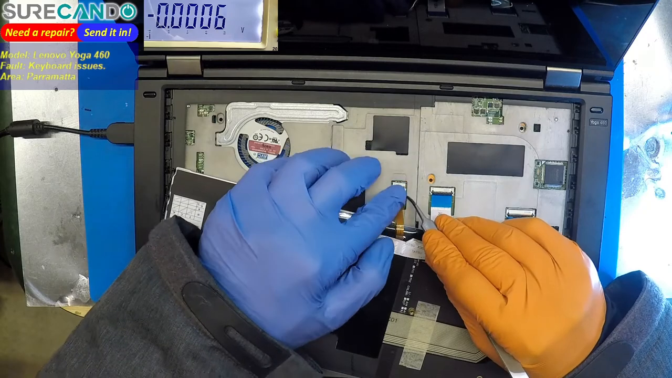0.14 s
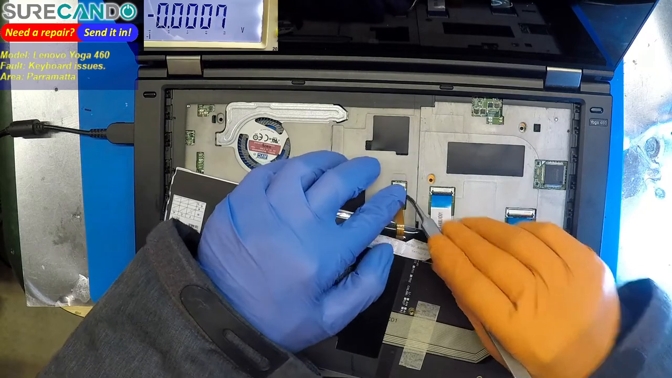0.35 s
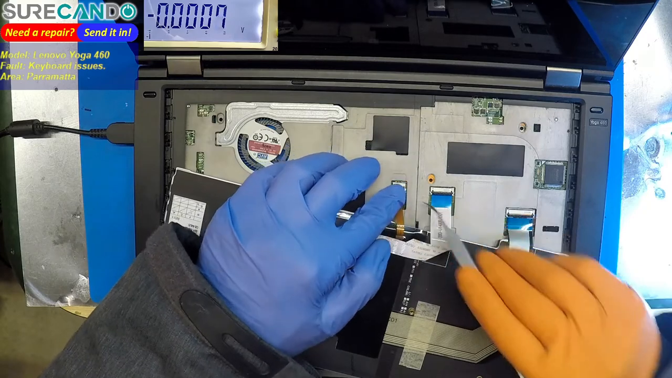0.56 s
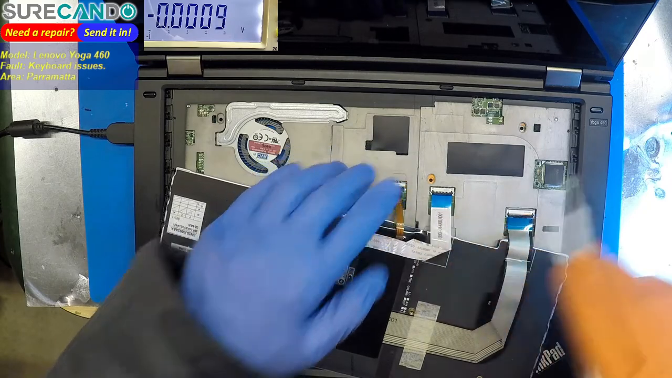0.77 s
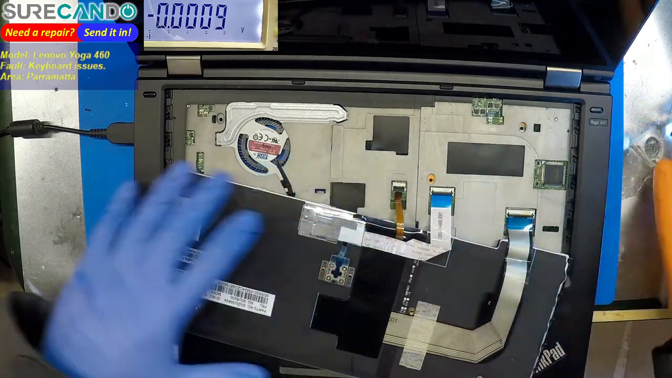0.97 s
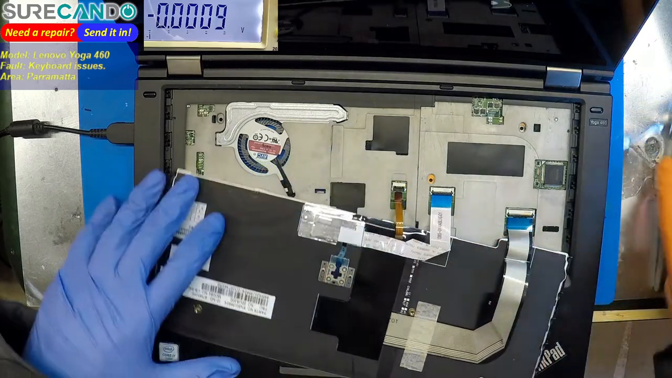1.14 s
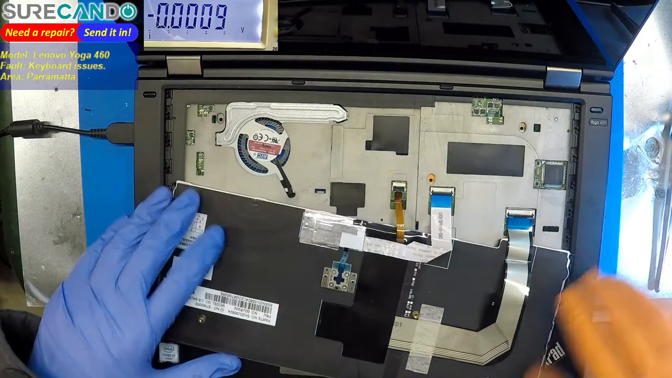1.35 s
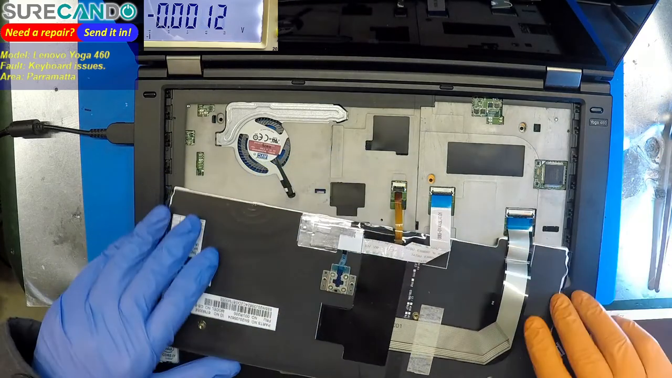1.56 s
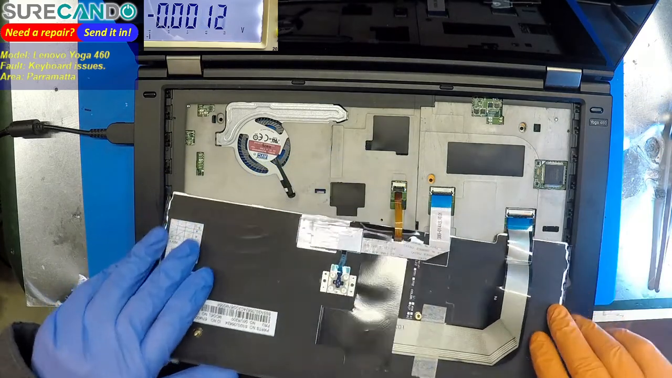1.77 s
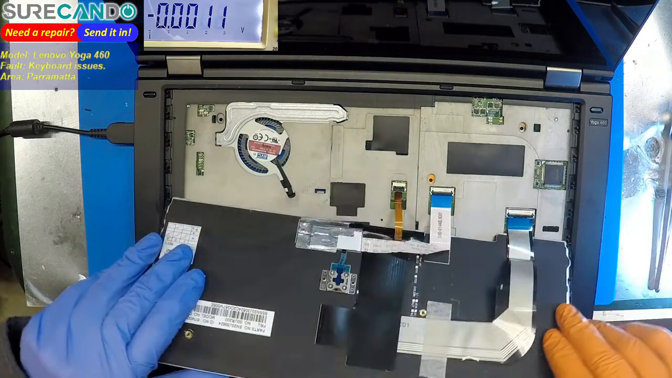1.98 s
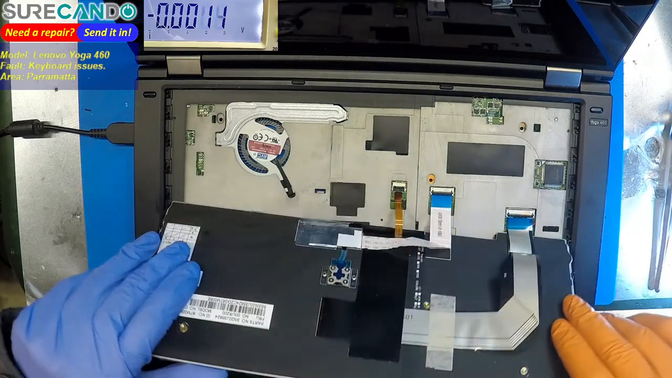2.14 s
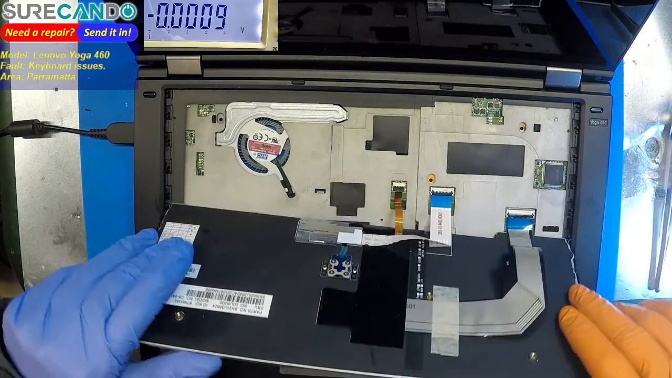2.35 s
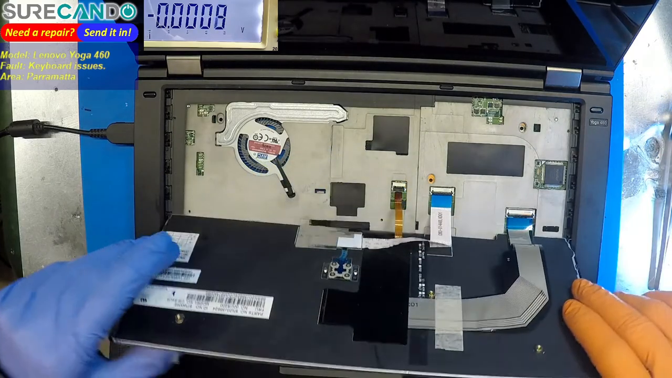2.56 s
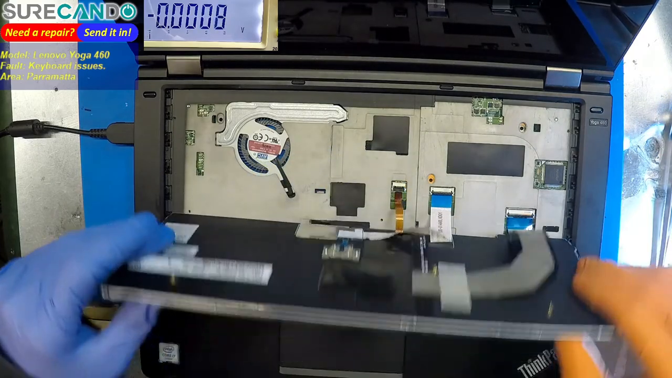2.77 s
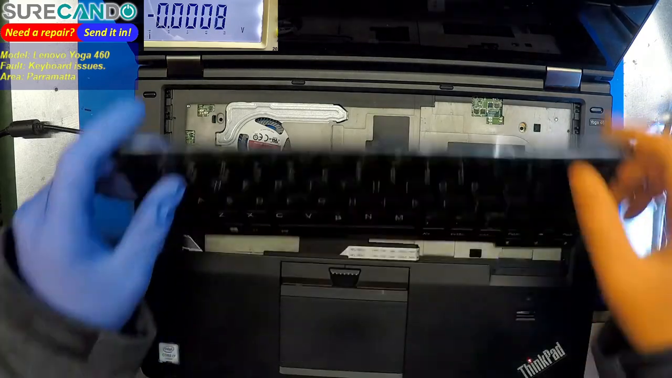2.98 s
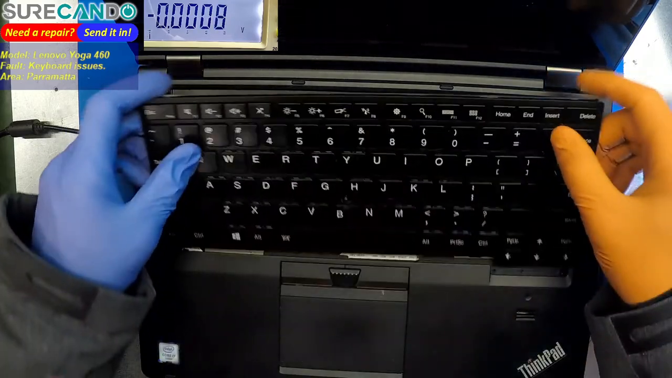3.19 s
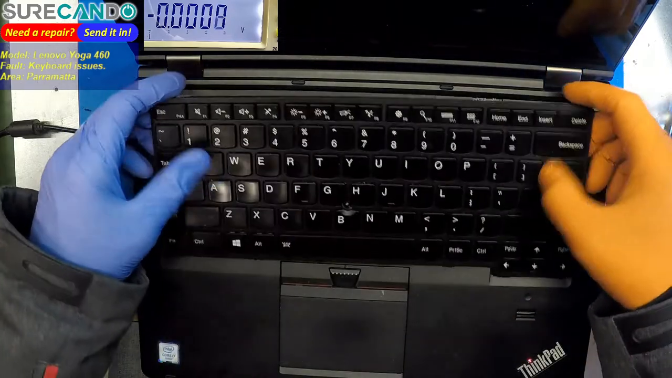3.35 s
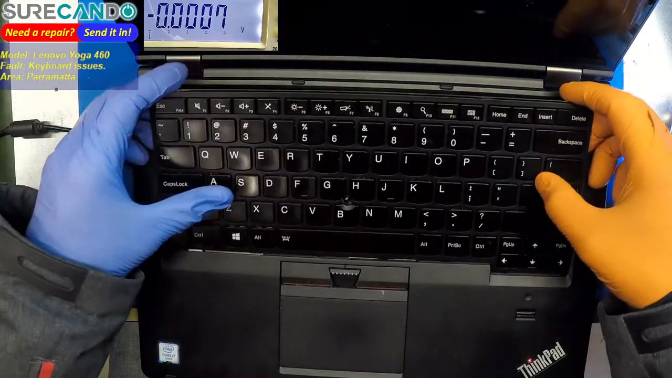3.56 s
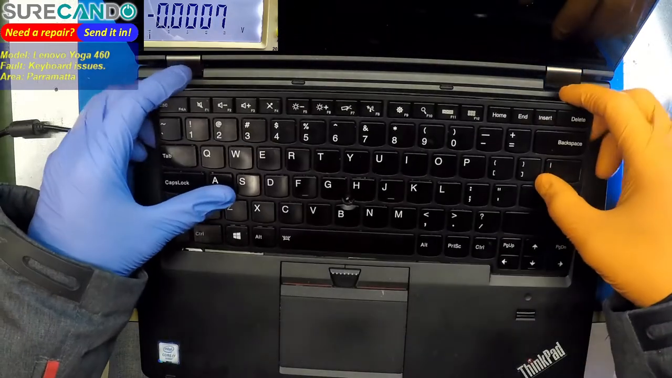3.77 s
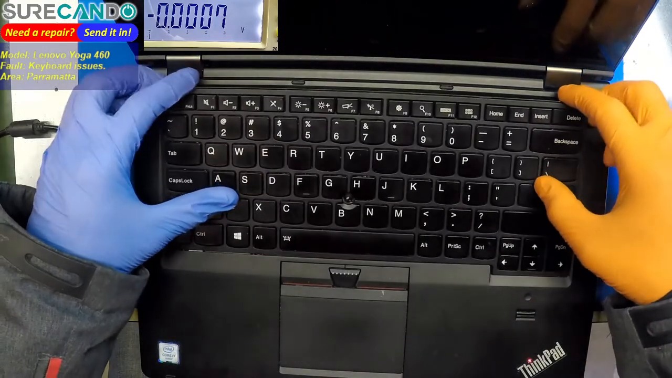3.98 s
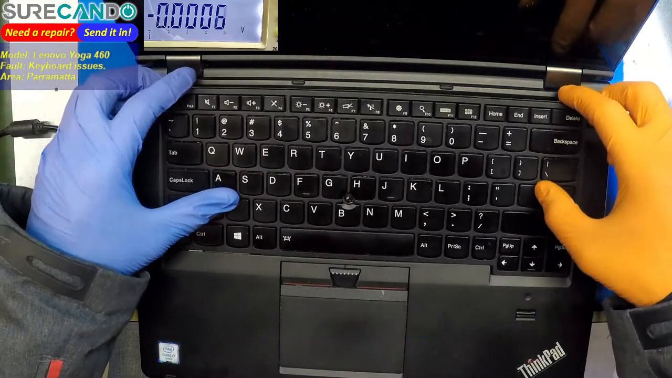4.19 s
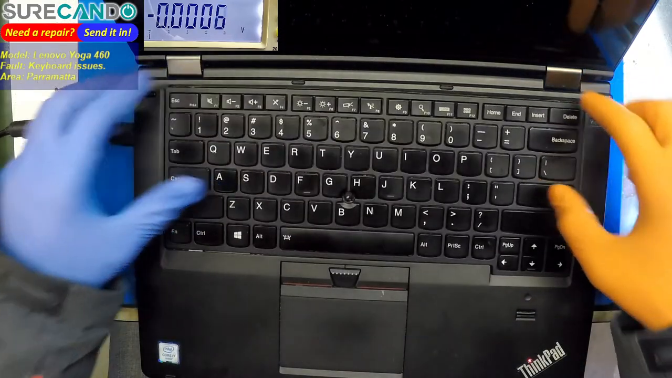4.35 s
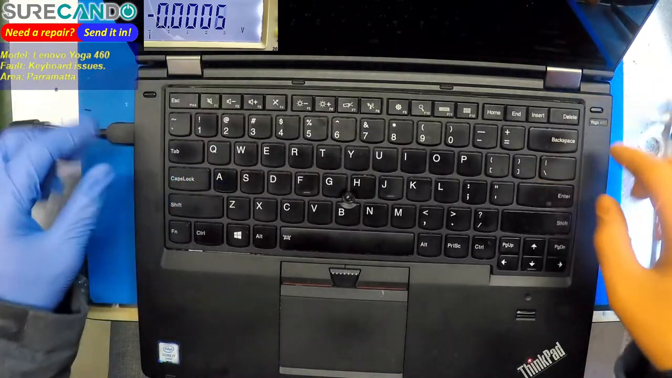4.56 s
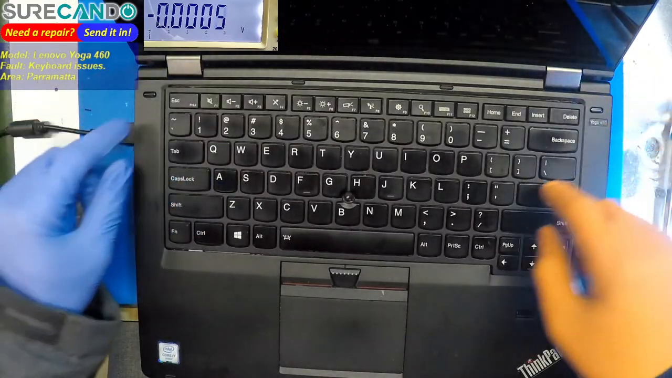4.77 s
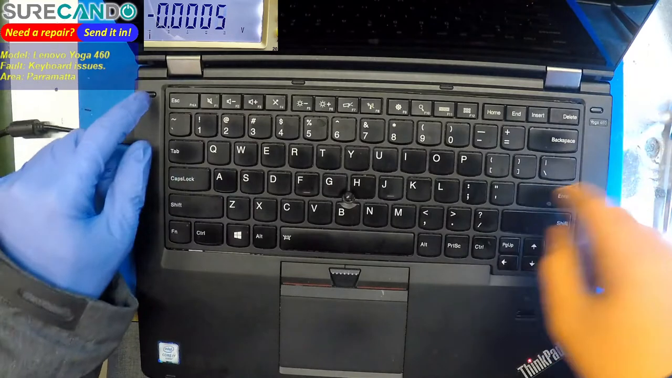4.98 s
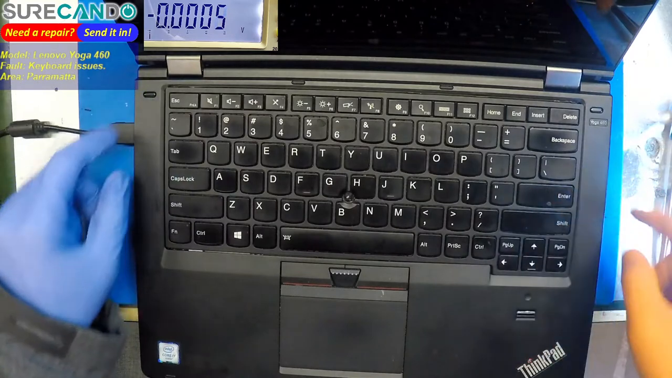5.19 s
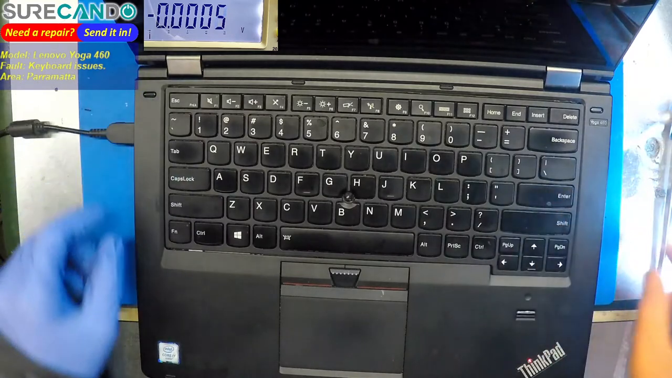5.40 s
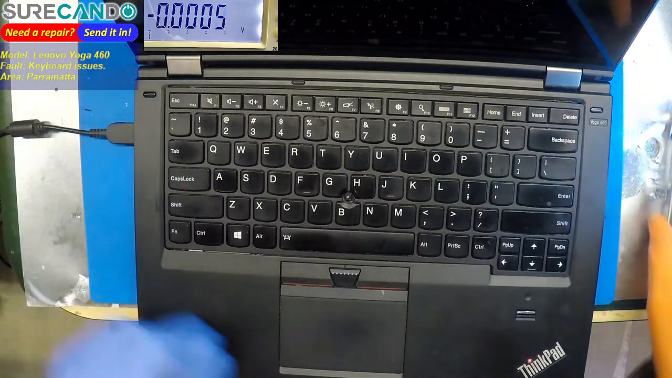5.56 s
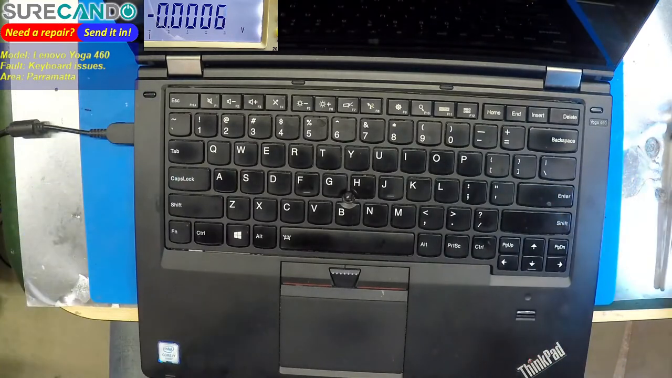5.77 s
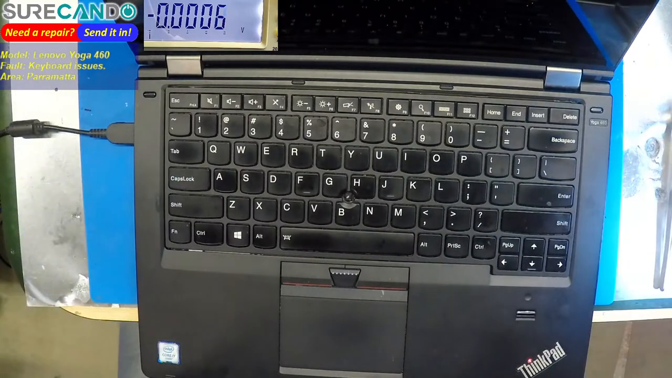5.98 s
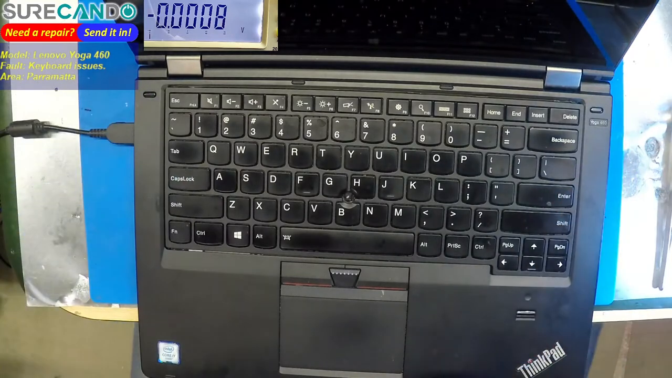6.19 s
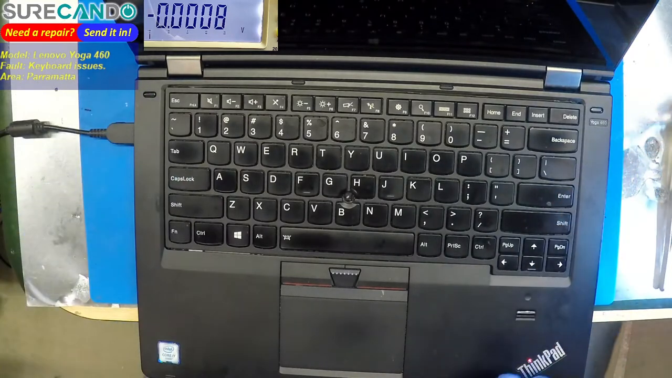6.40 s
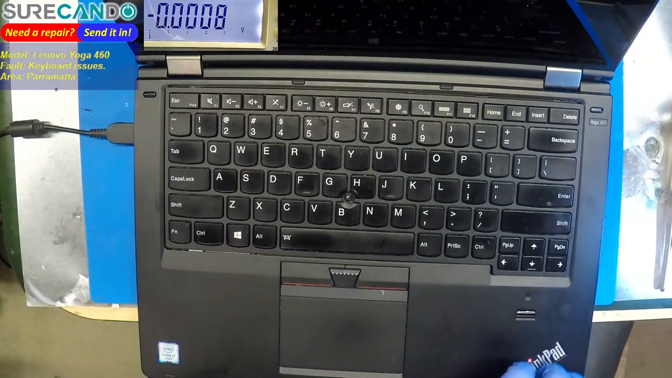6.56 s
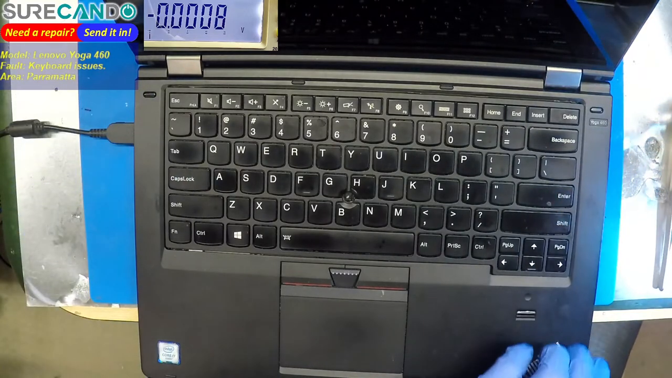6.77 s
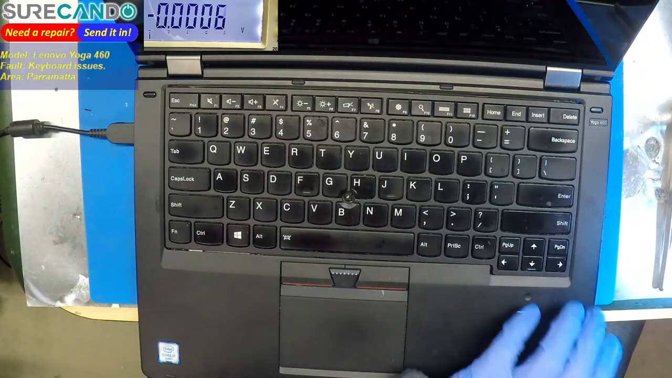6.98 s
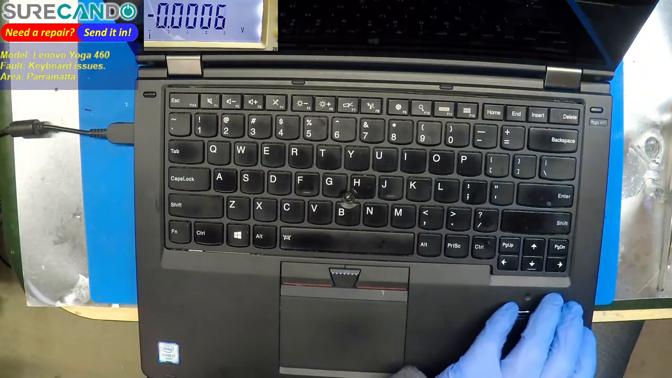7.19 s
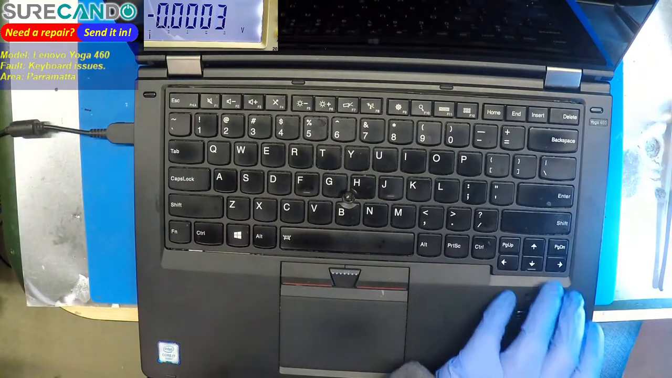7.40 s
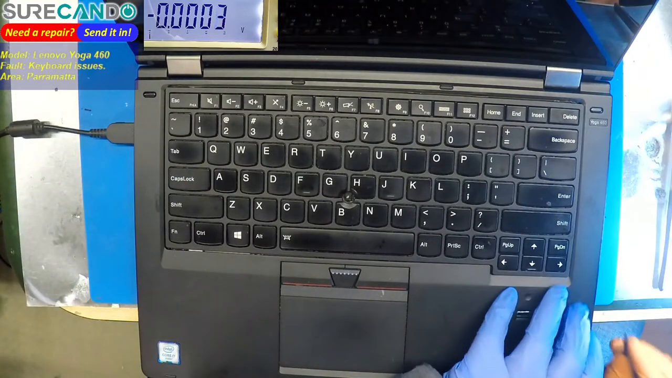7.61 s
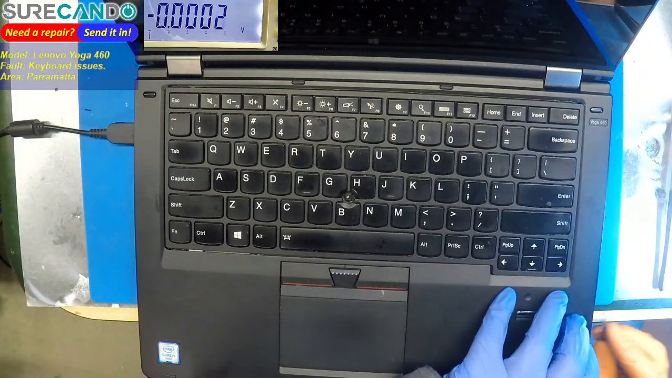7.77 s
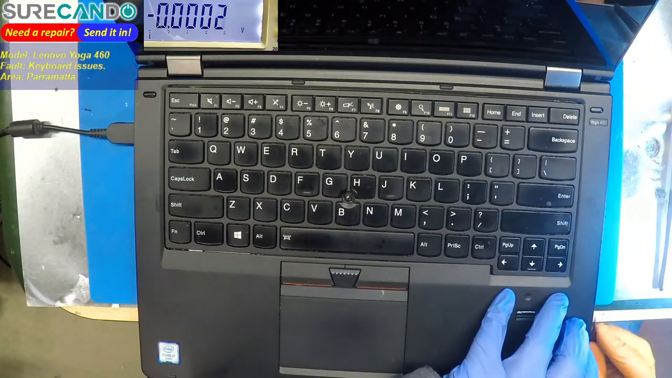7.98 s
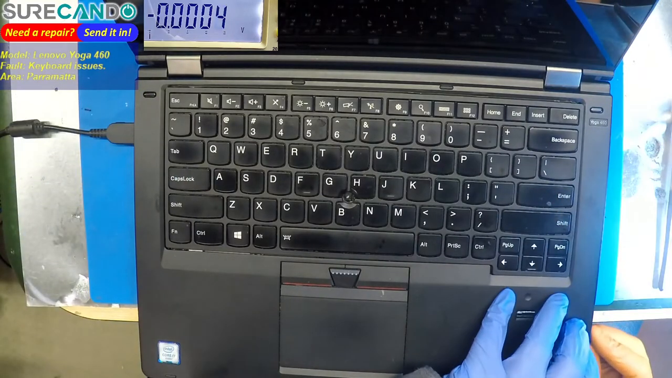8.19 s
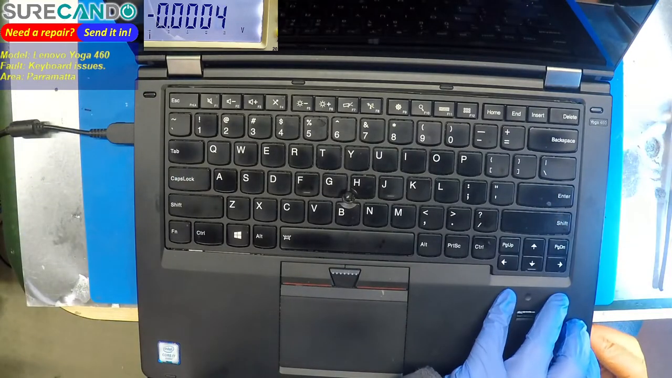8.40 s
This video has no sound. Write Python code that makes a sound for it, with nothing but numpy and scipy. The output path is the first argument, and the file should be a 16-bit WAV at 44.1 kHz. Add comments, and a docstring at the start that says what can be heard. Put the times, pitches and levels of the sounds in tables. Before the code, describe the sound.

A loose laptop keyboard clacks, scrapes and snaps into place on a bench, with soft rubbing and a vehicle droning outside.

```python
"""Plastic clicks and rattles: a loose laptop keyboard is turned over and snapped into its case on a bench.
Each blow rings the modes of plate and case into a small room; the keyboard drags in stick-slip scrapes
and heavy moves make the bench boom. Grainy hiss swells: rubbing, and the fading wash after loud knocks.
Behind it a vehicle drones outside, over room hush, mains hum, a thin electric whine and a meter's whistle."""
import sys
import numpy as np
from scipy import signal
from scipy.fft import rfft, irfft, next_fast_len
from scipy.io import wavfile
from scipy.ndimage import uniform_filter1d

SR = 44100
rng = np.random.default_rng(int(sys.argv[2]) if len(sys.argv) > 2 else 0)


def transcribe(u):
    """Save the signal u as a 16-bit wav file named by the first command-line argument.

    u: samples, shape (n,) or (channels, n), limited to [-1, 1]; the rate is SR.
    q: integer samples, one column per channel.
    """
    v = np.clip(np.atleast_2d(u).T, -1, 1)
    q = np.round(v * 32767).astype(np.int16)
    wavfile.write(sys.argv[1], SR, q)


N = 372204
TIME_S = np.arange(N) / SR


def knocks():
    """A brief swell of noise leads into each click, which chatters and rings plate, case and room."""
    # start_s, level_db, thud_db, panel_db, snap_db, panel_hz, clack_hz, rattle_ms, room_db, lead_in_db
    blows = [(0.1955, -39.5, -23, -23, -16, 1047, 2870, 1.7, -2.5, -23),
             (0.4212, -41, -24, -6, -8, 1080, 3200, 1.7, -4, -23),
             (0.438, -25, -31, -20.5, -11, 1410, 2360, 3.1, -7, -9),
             (0.622, -41, -24, -19, -18, 1030, 2510, 3.2, 1.5, -23),
             (0.9264, -26, -17, -7, -14, 1390, 2660, 1.5, -1.5, -41),
             (0.9318, -27, -24, -6, -10, 1360, 3400, 1.6, -2.5, -34),
             (0.9463, -37, -20, -8, -15, 1310, 2640, 2, 1, -20),
             (1.0284, -10, -16, -18, -13.5, 1770, 2930, 1.5, -6, -28),
             (1.0346, -11, -22, -14.5, -11, 979, 2800, 4.3, -20, -21),
             (1.0646, -20, -22, -7.5, -12, 1510, 3300, 1.8, -5.5, -25),
             (1.289, -40.5, -20, -20, -12, 904, 2400, 2.3, 5, -23),
             (1.3668, -43, -17, -24, -4, 1200, 5280, 2.3, -18, -23),
             (1.537, -31, -32, -13, -16, 958, 3020, 3.1, -5.5, -23),
             (1.6373, -34.5, -14, -13.5, -14, 1740, 2540, 2, -8, -21),
             (1.722, -30, -22, -14.5, -14, 2410, 4500, 2.7, -17, -21),
             (1.9319, -13.5, -25, -20, -16, 1900, 2690, 1.6, -16, -18),
             (2.0171, -37, -22, -17, -16.5, 1618, 2874, 2.8, -0.5, -23),
             (2.6261, -32, -27, -18, -12.5, 1943, 4450, 3.3, -17, -16),
             (2.7724, -29, -17, -13.5, -26, 1516, 2460, 3.7, -1.5, -21),
             (2.8674, -31, -14.5, -13, -9.5, 1040, 2900, 1.9, -1.5, -26),
             (2.9473, -19, -26, -19, -21, 1620, 3370, 1.7, -9, -11),
             (2.9622, -7.5, -28, -22.5, -14, 2040, 4270, 3, -16, -20),
             (2.9754, -25.5, -16.5, -20, -9, 1990, 4060, 3, -5.5, -23),
             (3.162, -29, -24, -14, -19, 2220, 2620, 2.3, -12, -23),
             (3.1753, -18.5, -19.5, -22, -24, 1320, 2730, 1.94, -11, -2.5),
             (3.246, -5.5, -35, -17.5, -10, 1600, 3290, 2.6, -13.5, -12),
             (3.2769, -0.5, -28, -23, -12, 1410, 3320, 2.6, -15, -18),
             (3.2864, -14, -20, -14.5, -14, 2060, 3130, 2.3, -18, -18),
             (3.3384, -3, -28, -16, -16, 936, 4670, 0.77, -19.5, -21),
             (3.4496, -7, -37, -22.5, -12, 1610, 4400, 2.9, -10, -35),
             (3.457, -13.5, -33, -16, -7.5, 1100, 4020, 2.6, -28, -26),
             (3.471, -13.5, -31, -20.5, -11.5, 1050, 4330, 3.4, -26, -36),
             (3.6126, -28.5, -35, -25, -9, 1000, 5220, 2.3, -25, -41),
             (3.6336, -39, -16, -11, -11, 2260, 3260, 1.28, -10, -18),
             (3.7215, -38, -14, -1, -14, 956, 2380, 1.8, -4.5, -15),
             (3.7956, -39.5, -20, -5, -11, 1390, 2700, 1.7, -3, -19),
             (3.8315, -19, -19, -14.5, -14, 1160, 2964, 1.27, -3, -13),
             (3.846, -11.5, -33, -13.5, -7, 1860, 2400, 2.6, -29, -32),
             (3.8509, -2, -35, -18.5, -10, 2470, 2510, 1.7, -17, -16),
             (3.9562, -19.5, -30, -19, -15, 1850, 2350, 2.1, -13, -14),
             (4.136, -46, -10, -11, -6, 997, 2750, 2.3, -20, -23),
             (4.2467, -16, -20, -24, -8.5, 1340, 4400, 1.86, -13.5, -9),
             (4.3077, -34, -27, -15, -4, 1220, 2600, 2.5, -15, -33),
             (4.3115, -35.5, -13, -17, -7, 1210, 2420, 2.5, -5, -25),
             (5.4183, -33, -21, -19, -27, 1035, 5490, 0.93, -27, -17),
             (5.5248, -34, -19, -12, -21, 1480, 3030, 3.4, 0.5, -24.5),
             (5.7664, -36, -10, -8, -16, 1780, 2460, 2.3, 1.5, -23),
             (5.8568, -41, -13, -7, -22, 1780, 2440, 2.25, -22, -23),
             (5.9888, -31, -17, -14, -19, 1773, 2730, 2.9, -4, -21),
             (6.0198, -26.5, -19, -12.5, -20, 1700, 2510, 4.1, -14, -23),
             (6.1804, -20, -21, -15, -8, 2210, 3820, 2.3, -8.5, -26),
             (6.2977, -28.5, -9.5, -6.5, -14, 1660, 2850, 1.7, -6.5, -23),
             (6.3915, -41, -3, -3, -20, 1580, 2430, 2.7, -7, -23),
             (6.6102, -15.5, -28.5, -23, -9.5, 1460, 4470, 2.7, -12, -28),
             (6.6934, -40, 3, -8, -11, 1502, 2620, 1.5, -15, -23),
             (6.7045, -28.5, -10, -10, -15, 1670, 3020, 2.7, -21, -23),
             (6.728, -19.5, -32, -14, -34, 1490, 2330, 1.7, -17, -35),
             (6.7442, -6, -28, -18, -14, 1650, 5600, 4, -17, -13),
             (6.7669, -26, -23, -13, -11.5, 1940, 2410, 1.8, -1, -23),
             (6.9734, -38.5, 1, -8, -8, 1003, 2440, 1.8, -5.5, -29),
             (6.982, -44.5, -5, 10, -20, 1540, 3420, 2.3, -10, -25),
             (7.0117, -40.5, -10, -27, -3, 1110, 2600, 2.1, -17, -23),
             (7.3816, -30.5, -15, -17, -26, 1877, 2850, 1.9, -18, -9),
             (7.7075, -37.5, -23, -18, -18, 1315, 2720, 2.3, -14, -20),
             (7.7416, -40, -22, -20, -27, 1074, 2610, 2.3, -3, -20),
             (7.9745, -35, -22, 0, -38.5, 1900, 2540, 1.6, -14, -26),
             (8.1993, -48.5, -18, 6, -30, 1670, 2474, 2.3, -9, -11),
             (8.31, -20.5, -24, -16, -23.5, 1470, 3810, 2.4, -12.5, -30)]
    # thud, panel, clack, snap and top bands: low_hz, high_hz
    bands_hz = [(250, 900), (900, 2400), (2400, 5500), (5500, 10000), (10000, 15000)]
    # one value per band
    carry_db = [-1.7, 3, -10.5, 1, -8]
    rattle_stretch = [2.9, 2.75, 0.95, 0.83, 0.79]  # factor on rattle_ms; low bands chatter longer
    crack_gain = [1, .22, .45, .55, 1]  # unpitched part
    room_t60_s = [0.26, 0.35, 0.21, 0.18, 0.094]
    tail_ring_gain = [0, .7, .25, .3, 0]  # room tail fed through the modes
    lead_in_rise_s, room_rise_s = 0.0041, 0.0052
    size, lead = SR // 3, SR // 40
    t = np.arange(size) / SR
    tracks = np.zeros((len(bands_hz), N + size + lead))
    for (start_s, level_db, thud_db, panel_db, snap_db,
         panel_hz, clack_hz, rattle_ms, room_db, lead_in_db) in blows:
        i = int(start_s * SR)
        share_db = np.add(carry_db, [thud_db, panel_db, 0, snap_db, snap_db])
        lead_in = undb(lead_in_db) * np.exp(-t[lead:0:-1] / lead_in_rise_s)
        snap_hz = 7500 * np.exp(.1 * rng.uniform(-1, 1))
        for k, spot_hz in enumerate([0, panel_hz, clack_hz, snap_hz, 0]):  # 0: no modes
            chatter = rng.standard_normal(size + lead)
            chatter[lead] = 4  # first contact
            decay = np.exp(-t * 1000 / (rattle_ms * rattle_stretch[k]))
            tail = undb(room_db - 60 * t / room_t60_s[k]) * (1 - np.exp(-t / room_rise_s))
            blow = chatter * np.r_[lead_in, decay]
            room = chatter * np.r_[np.zeros(lead), tail]
            if spot_hz:
                blow = crack_gain[k] * blow + 1.5 * body_ring(blow + tail_ring_gain[k] * room, spot_hz)
            blow += crack_gain[k] * room
            low_hz, high_hz = bands_hz[k]
            band_share = (high_hz - low_hz) / (SR / 2)
            tracks[k, i:i + size + lead] += blow * undb(level_db + share_db[k]) / np.sqrt(band_share)
    return sum(band(x[lead:lead + N], *edges, order=3) for x, edges in zip(tracks, bands_hz))


def body_ring(blow, spot_hz):
    """A blow rings the modes near the pitch of the struck spot."""
    # plate and case modes: pitch_hz, width_hz
    modes = [(1030, 160), (1200, 220), (1350, 250), (1500, 105), (1700, 150), (1880, 164), (2060, 105),
             (2300, 520), (2700, 220), (3000, 64), (3270, 250), (3650, 190), (4070, 240), (4500, 130),
             (4950, 260), (5430, 140), (6000, 140), (6400, 510), (6850, 240), (7300, 120), (7700, 110),
             (8400, 220), (9200, 420)]
    log_spread = .06
    out = np.zeros_like(blow)
    for pitch_hz, width_hz in modes:
        gain = np.exp(-.5 * (np.log(pitch_hz / spot_hz) / log_spread) ** 2)
        if gain > .02:
            out += gain * ring(blow, pitch_hz, width_hz)
    return out


def scraping():
    """The keyboard drags over the case: dense, uneven stick-slip clicks ring its plate."""
    # drags: peak_s, level_db, swell_s, fade_s, brightness_db
    drags = [(.41, -57, 0.36, .09, 0), (2.391, -51, 0.022, 0.057, -6), (2.451, -48.5, 0.048, 0.069, -3.5),
             (2.495, -48.5, 0.091, .025, -7), (2.77, -47, 0.055, 0.072, -4),
             (2.837, -33.5, 0.021, 0.036, -10), (2.87, -60, 0.036, .08, 0), (5.755, -43, 0.056, 0.081, -13),
             (5.99, -45.5, 0.063, .04, -22), (6.03, -50, 0.055, 0.022, -10),
             (6.30, -40.5, 0.013, 0.065, -4)]
    # plate modes, low to high: pitch_hz, width_hz, gain_db
    modes = [(1473, 390, 10), (2580, 600, 4), (3200, 240, 1), (4370, 600, 4), (6170, 1300, 6),
             (8050, 2200, -0.5), (10850, 5100, -13)]
    slips = rng.standard_normal(N) * undb(1.5 * rng.exponential(size=N) + 2.5 * walk(150))
    rings = [undb(gain_db) * ring(slips, hz, width_hz) for hz, width_hz, gain_db in modes]
    dull, bright = level(sum(rings[:3]), 0), level(sum(rings[3:]), 0)
    dull_gain = sum(swell(*move) for *move, _ in drags)
    bright_gain = sum(swell(*move) * undb(brightness_db) for *move, brightness_db in drags)
    return dull * uniform_filter1d(dull_gain, 400) + bright * uniform_filter1d(bright_gain, 400)


def bench_thumps():
    """Heavy moves set off a dull, noisy resonance of the bench top."""
    # booms: start_s, pitch_hz, level_db, t60_s
    booms = [(1.031, 170, -25.5, 0.12), (2.85, 123.7, -45, 0.24), (3.171, 102, -40, 0.43),
             (3.28, 96.5, -37, 0.35), (3.85, 141, -39, 0.098), (4.25, 148, -41.5, 0.2),
             (5.76, 178, -46, 0.27), (7.439, 284, -42.5, 0.3)]
    rise_s, q = 0.011, 6.4
    out = np.zeros(N)
    for start_s, pitch_hz, level_db, t60_s in booms:
        t = np.maximum(TIME_S - start_s, 0)
        envelope = undb(level_db - 60 * t / t60_s) * (1 - np.exp(-t / rise_s))
        out += envelope * level(ring(rng.standard_normal(N), pitch_hz, pitch_hz / q), 0)
    return out


def grainy_hiss():
    """Swells of grainy hiss: rubbing, and the fading wash after loud knocks."""
    # swells: peak_s, level_db, swell_s, fade_s
    swells = [(0, -47.5, .1, 0.091), (0.751, -55, 0.32, 0.37), (1.12, -52, .15, 0.57),
              (1.6, -61.5, 0.59, 0.66), (2.419, -63.5, 0.63, 0.46), (2.94, -51, 0.47, 0.37),
              (3.28, -43.5, 0.23, 0.17), (3.68, -61.5, 0.32, 0.45), (4.22, -54.5, 0.14, 0.58),
              (4.7, -62.5, 0.32, .6), (5.45, -56.5, 0.66, 0.79), (5.88, -50, 0.65, 0.54),
              (6.42, -61, 0.496, 0.87), (6.75, -54, 0.67, 0.28), (7.36, -55, 0.74, 0.63)]
    # dull rustle: time_s, level_db
    rustle = [(0.0, -59.5), (0.96, -58), (1.1, -52.5), (1.34, -56), (2.0, -63.5), (2.3, -58), (3.38, -54),
              (3.55, -57), (4.09, -49.5), (4.49, -53.5), (5.08, -58), (5.97, -46), (6.51, -51),
              (6.82, -51.5), (7.05, -56), (7.45, -54.5), (7.78, -57), (8.44, -60)]
    # hiss spectrum: frequency_hz, density_db
    spectrum = [(300, 9.5), (450, 0.5), (1000, 5.5), (1700, 1.5), (2600, -2.5), (4500, -10.5), (7000, -9),
                (8600, -8.5), (9600, -11), (13000, -8.5), (16500, -9)]
    crackles_per_s, crackle_db, still_db = 12, 6, -77
    grain_db = 1.5 * walk(300) + .8 * walk(25)
    crackle_onsets = 1. * (rng.random(N) < crackles_per_s / SR)
    crackles = uniform_filter1d(crackle_onsets, size=60) * 60
    grain_db += crackle_db * np.minimum(crackles, 1)
    dull_db, = curves(rustle)
    hiss_db = 20 * np.log10(undb(still_db) + sum(swell(*row) for row in swells))
    top_db = -36 + 0.62 * hiss_db
    out = np.zeros(N)
    for low_hz, high_hz, level_db in [(2400, 9000, hiss_db), (400, 2400, dull_db), (9000, 17000, top_db)]:
        hiss = coloured(rng.standard_normal(N) * undb(grain_db), spectrum)
        out += level(band(hiss, low_hz, high_hz), level_db)
    return out


def traffic():
    """An unsteady engine drone behind the wall sinks in pitch, over rumble that drops near the end."""
    # engine: time_s, pitch_hz, drone_db, third_harmonic_db
    engine = [(0, 58.1, -47, -71), (.21, 57.4, -41, -75), (.75, 57.2, -46, -75), (1.05, 50.9, -45.5, -60),
              (1.43, 56.4, -52, -85), (1.8, 58.1, -46.5, -61.5), (2.5, 53.3, -50, -65.5),
              (2.7, 47.2, -52, -65), (2.94, 45.2, -49.5, -66), (4.04, 44.1, -44, -54),
              (4.45, 43.6, -52, -50), (5.03, 43.7, -45, -72), (5.4, 43.7, -51.5, -49.5),
              (5.62, 44.16, -44, -75), (5.92, 43.8, -53.5, -59), (6.56, 42.5, -52, -55.5),
              (6.8, 42.5, -53, -55.5), (7.24, 44.5, -53.5, -68), (8.44, 43.6, -54.5, -59.5)]
    pitch_hz, drone_db, third_db = curves(engine)
    rumble_db = np.interp(TIME_S, [6.5, 7.5], [-54, -65.5]) + 5.5 * walk(6.1)
    phase = 2 * np.pi * np.cumsum(pitch_hz * (1 + 0.0208 * walk(8.8))) / SR
    tone = np.sin(phase) * undb(2.7 * walk(7.0))
    boom = band(rng.standard_normal(N), 43.7, 74.0)
    rumble = band(rng.standard_normal(N), 46.0, 115.0)
    third = np.sin(3 * phase) * undb(third_db)
    drone = level(tone, 0) + level(boom, -8)
    return drone * undb(drone_db) + level(rumble, rumble_db) + third


def room_air():
    """Steady hush, with mains hum and electric whine as narrow bands of noise."""
    # hush spectrum: frequency_hz, density_db
    spectrum = [(20, -2), (26, -12), (32, -12), (60, 1), (200, -7.5), (500, -12.5), (1500, -24),
                (2500, -36), (4500, -30), (9000, -34), (13000, -32.5), (16500, -53)]
    # hum and whine: pitch_hz, width_hz, level_db
    whines = [(150, 4, -66), (12260, 350, -78)]
    air = level(coloured(rng.standard_normal(N), spectrum), db=-56)
    for pitch_hz, width_hz, level_db in whines:
        whine = ring(rng.standard_normal(N), pitch_hz, width_hz)
        air += level(ring(whine, pitch_hz, width_hz), level_db)
    return air


def meter_whistle():
    """A bench meter's circuit whistles faintly during each reading."""
    pitch_hz, start_s, cycle_s, on_s = 5099, .243, .2527, .1
    reading = 1. * ((TIME_S - start_s) % cycle_s < on_s)
    whistle = level(np.sin(2 * np.pi * pitch_hz * TIME_S), db=-74.5)
    return uniform_filter1d(reading, size=300) * whistle


def swell(peak_s, level_db, swell_s, fade_s):
    """Gain envelope: up 20 dB per swell_s, down 20 dB per fade_s."""
    return undb(level_db - 20 * np.maximum((peak_s - TIME_S) / swell_s, (TIME_S - peak_s) / fade_s))


def undb(db):
    """Decibels to gain."""
    return 10 ** (np.asarray(db) / 20)


def level(x, db):
    """Scale to unit rms, then by db."""
    return x * undb(db) / np.sqrt(np.mean(x ** 2))


def band(x, low_hz, high_hz, order=2):
    """Butterworth band-pass."""
    return signal.sosfilt(signal.butter(order, [low_hz, high_hz], "bandpass", fs=SR, output="sos"), x)


def ring(x, hz, width_hz):
    """One resonance, gain 1 at its centre."""
    return signal.lfilter(*signal.iirpeak(hz, hz / width_hz, fs=SR), x)


def coloured(x, spectrum):
    """Shape noise by rows of frequency_hz, density_db."""
    hz, db = np.transpose(spectrum)
    size = next_fast_len(N)
    bin_hz = np.arange(size // 2 + 1) * SR / size + 1
    gain = undb(np.interp(np.log(bin_hz), np.log(hz), db))
    return irfft(rfft(x, size) * gain, size)[:N]


def walk(rate_hz):
    """Ramps between random values, rate_hz a second; spread near 1."""
    hold = int(SR / rate_hz)
    steps = np.repeat(rng.standard_normal(N // hold + 1), hold)
    return 0.95 * uniform_filter1d(steps, hold)[:N]


def curves(table):
    """Interpolate each later column over the first, time_s."""
    time_s, *columns = np.transpose(table)
    return [np.interp(TIME_S, time_s, column) for column in columns]


def scene():
    """Mono sum on both channels."""
    mono = knocks() + bench_thumps() + grainy_hiss() + scraping() + traffic() + room_air() + meter_whistle()
    return np.array([mono, mono])


def record(dry):
    """Steep elliptic low-pass."""
    cutoff_hz = 15750
    return signal.sosfilt(signal.ellip(10, .3, 60, cutoff_hz, fs=SR, output="sos"), dry)


dry = scene()
out = record(dry)
transcribe(out)
```